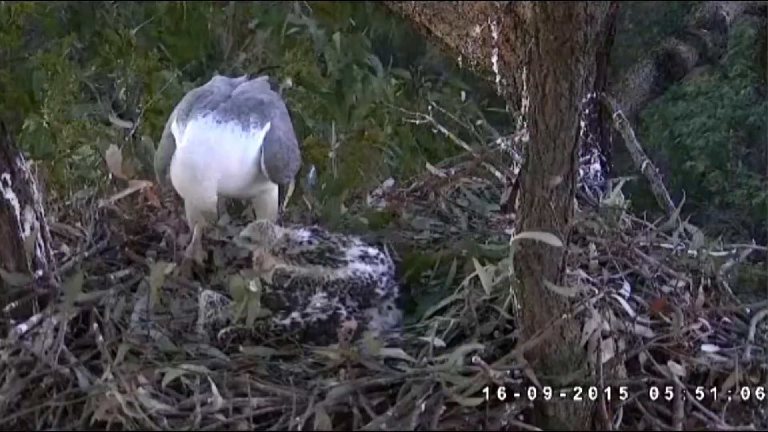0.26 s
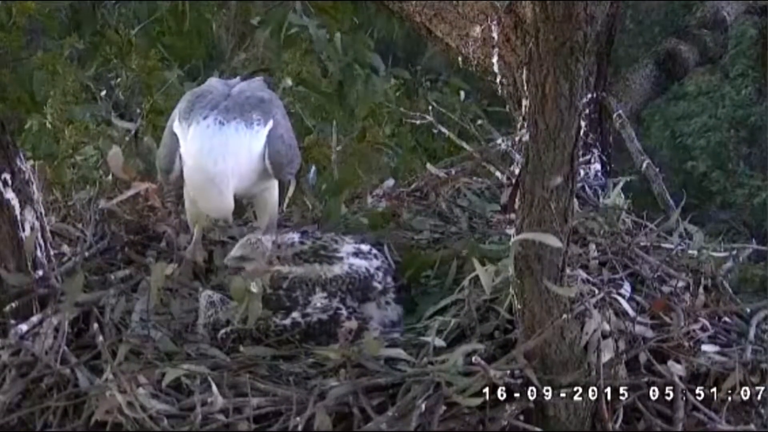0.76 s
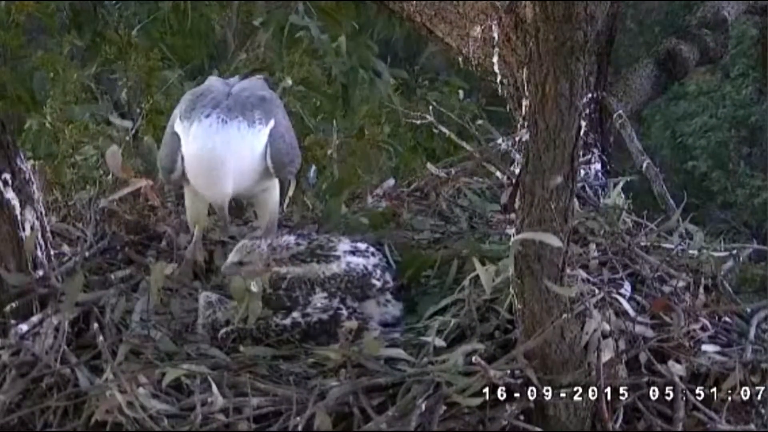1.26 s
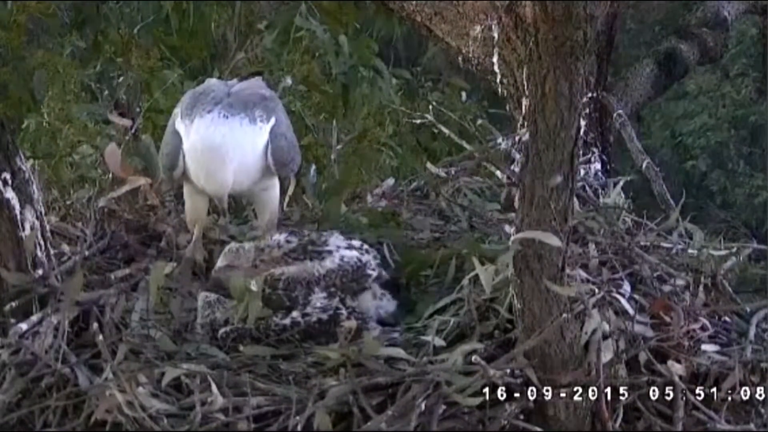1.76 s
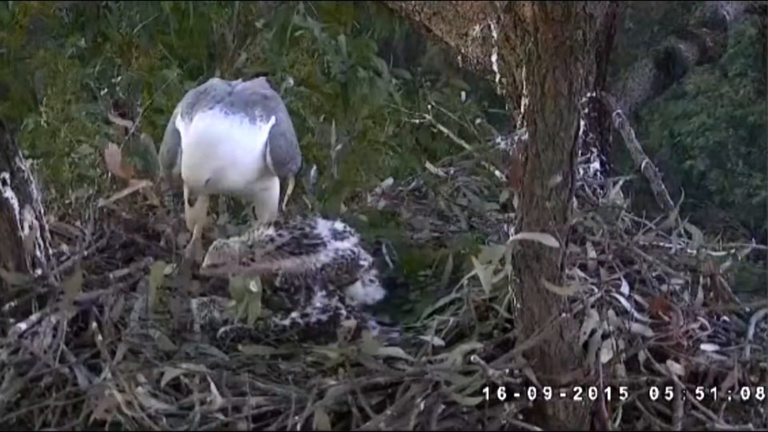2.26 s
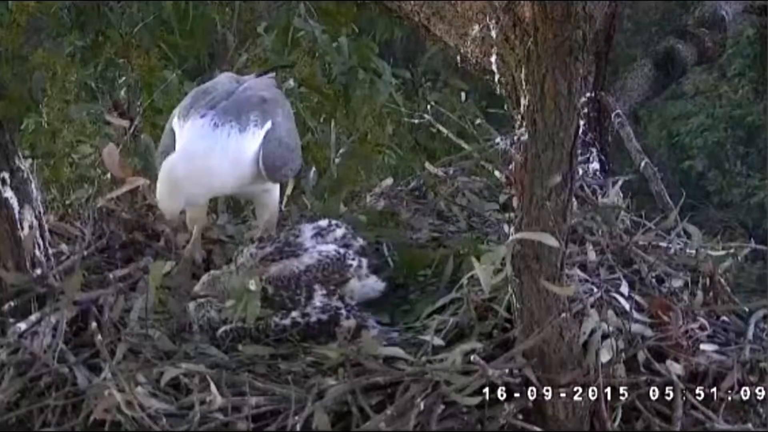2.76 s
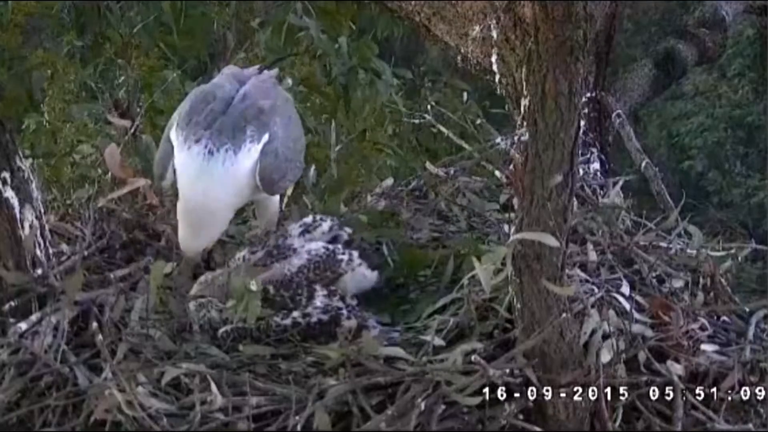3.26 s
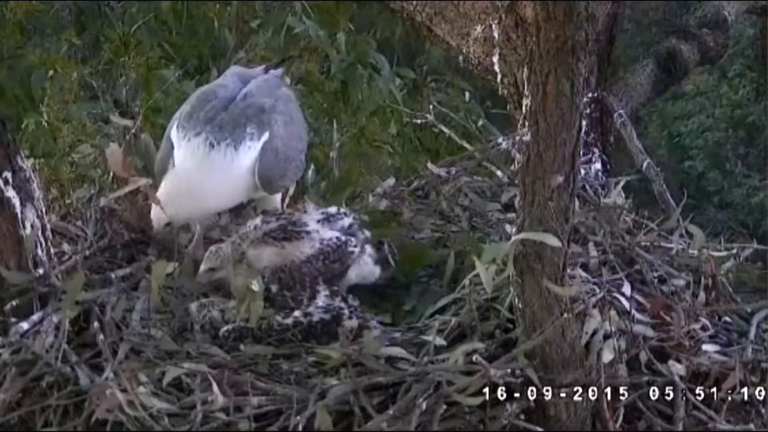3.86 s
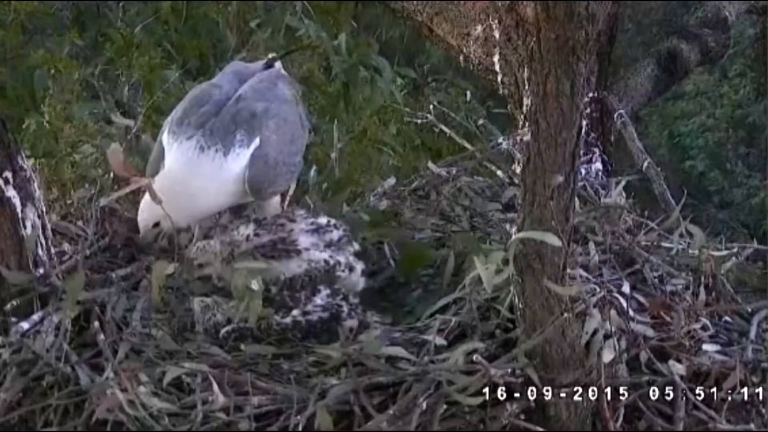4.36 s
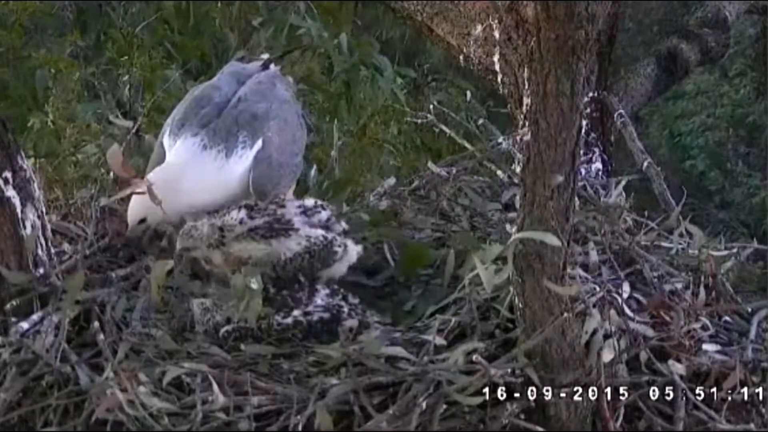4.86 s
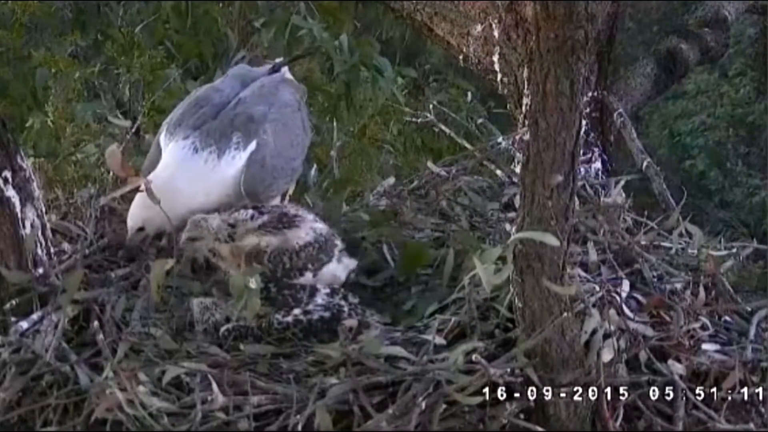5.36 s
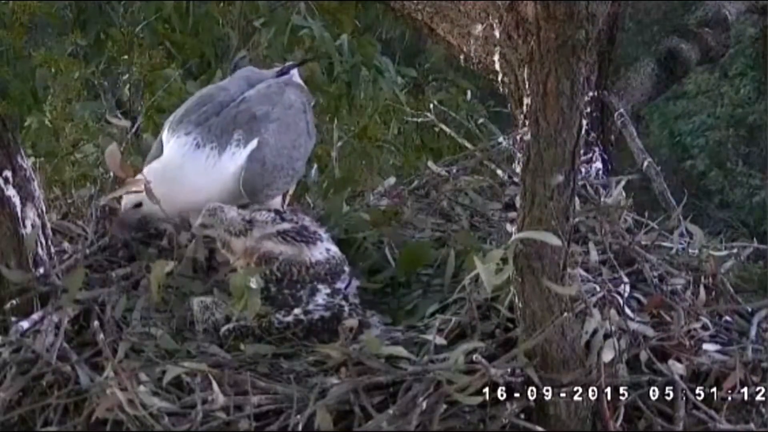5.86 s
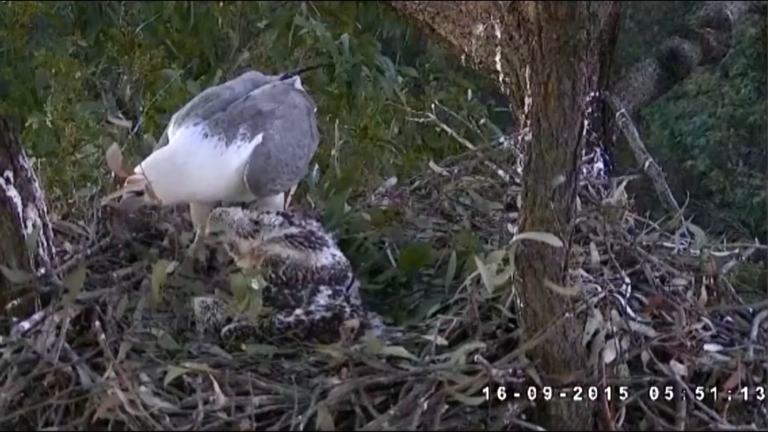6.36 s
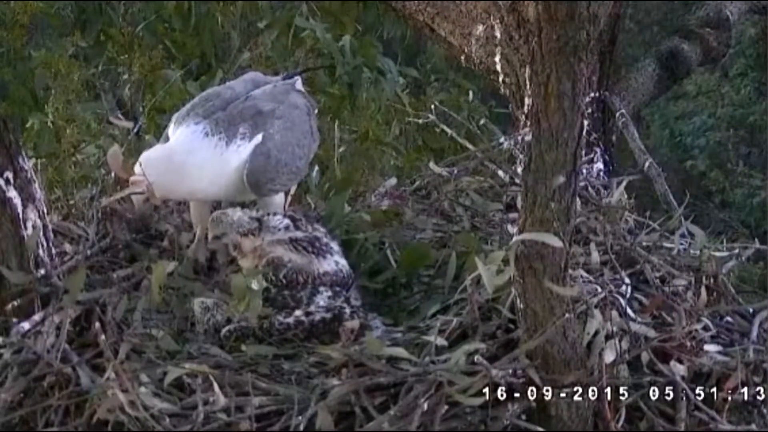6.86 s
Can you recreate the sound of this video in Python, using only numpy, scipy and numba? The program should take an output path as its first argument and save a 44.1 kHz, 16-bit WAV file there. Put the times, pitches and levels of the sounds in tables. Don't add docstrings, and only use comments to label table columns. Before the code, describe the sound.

A young raptor gives five harsh, raspy screeches from a forest nest, each ringing through the trees over low rumble and hum, with leaf rustles and twig snaps.

```python
import sys
import numpy as np
from scipy import signal
from scipy.fft import rfft, irfft, dct, next_fast_len
from scipy.io import wavfile
from scipy.ndimage import uniform_filter1d
from numba import njit

SR = 44100
rng = np.random.default_rng(int(sys.argv[2]) if len(sys.argv) > 2 else 0)


def wrap_up_sound(samples):
    columns = np.atleast_2d(samples).T
    tamed = np.clip(columns, -1, 1)
    steps = np.round(tamed * 32767).astype(np.int16)
    wavfile.write(sys.argv[1], SR, steps)


def ratio_of_db(decibels):
    return 10 ** (np.asarray(decibels, float) / 20)


N = 313110

# (start [s], length [s], full effort [dB], swell [s], start below full [dB])
CALLS = [
    (0.18, 0.44, -39, 0.13, 10),
    (1.395, 0.45, -40, 0.059, 6),
    (2.269, 0.4, -38, 0.27, 1.5),
    (3.066, .46, -37.5, 0.19, 3.5),
    (6.029, 0.44, -38, 0.24, 5),
]


def rms_one(x):
    return x / np.sqrt(np.mean(x ** 2) + 1e-20)


def drift(rate):
    knots = rng.standard_normal(int(N / SR * 400))
    slow = signal.lfilter([1], [1, -np.exp(-rate / 64)], knots)
    place = np.linspace(40, len(slow) - 1, N)
    return np.interp(place, np.arange(len(slow)), rms_one(slow))


def coloured(x, spectrum):
    size = next_fast_len(len(x))
    hz, db = np.transpose(spectrum)
    bin_hz = np.arange(size // 2 + 1) * SR / size
    gain = ratio_of_db(np.interp(np.log(bin_hz + 1), np.log(hz), db))
    return rms_one(irfft(rfft(x, size) * gain, size)[:len(x)])


def gate(start, length, rise, fall):
    t = np.arange(N) / SR - start
    return np.clip(np.minimum(t / rise, (length - t) / fall + 1), 0, 1)


def traffic():
    # (frequency [Hz], density [dB per Hz])
    traffic_spectrum = [(22, -25), (50, -11.5), (130, -7.5), (155, -3), (220, -6.5), (295, 0), (345, -1.5),
                        (400, -12), (480, -17.5), (570, -22.5), (780, -22.5), (930, -13.5), (1080, -20.5),
                        (1400, -32)] + [(2500, -59.0)]
    return ratio_of_db(-43.5 + 1.2 * drift(1.6)) * coloured(rng.standard_normal(N), traffic_spectrum)


def far_leaves():
    # (frequency [Hz], density [dB per Hz])
    leaf_spectrum = [(500, -50)] + [(900, -19.5), (1400, 10), (2000, -3.5), (3200, -2), (4200, -11),
                                    (7000, -9.5), (9000, -19.5), (11700, -34)]
    return ratio_of_db(-66) * coloured(rng.standard_normal(N), leaf_spectrum)


def hum():
    # (frequency [Hz], level [dB], wavering [dB])
    machine_tones = [
        (349.3, -52, 2.5),
        (381.9, -45, .6),
        (1145.8, -62, .6),
    ]
    out = np.zeros(N)
    for hz, db, waver_db in machine_tones:
        level = np.sqrt(2) * ratio_of_db(db + waver_db * drift(4.6))
        cycles = np.cumsum(hz + .6 * waver_db * drift(5)) / SR
        out += level * np.sin(2 * np.pi * cycles)
    return out


def forest(x):
    # (frequency [Hz], time to fall by 60 dB [s])
    decay_times = [(800, 1.2), (2000, 1.36), (3000, 1.24), (5000, 1.4), (9000, 1)]
    hz, t60 = np.transpose(decay_times)
    t = np.arange(round(1.5 * SR)) / SR
    edges = 500 * 2 ** np.arange(0, 4.6, .5)
    echo = np.zeros(len(t))
    for low, high in zip(edges, edges[1:]):
        sos = signal.butter(2, [low, high], "band", fs=SR, output="sos")
        band = signal.sosfilt(sos, rng.standard_normal(len(t)))
        echo += band * ratio_of_db(-60 * t / np.interp(np.sqrt(low * high), hz, t60))
    echo *= (1 - np.exp(-t / 0.01)) / np.sqrt(np.sum(echo ** 2))
    start, stop = round(CALLS[0][0] * SR), round(sum(CALLS[0][:2]) * SR)
    earlier = np.r_[rms_one(x[start:stop]) * ratio_of_db(-39.5), np.zeros(SR // 5)]
    wash = signal.fftconvolve(np.r_[earlier, x], echo)
    return ratio_of_db(-9.5) * wash[len(earlier):len(earlier) + N]


@njit
def resonate(x, hz, width_hz, sr):
    r = np.exp(-np.pi * width_hz / sr)
    turn = np.cos(2 * np.pi * hz / sr)
    y = np.zeros_like(x)
    for i in range(2, len(x)):
        drive = (1 - r[i] ** 2) / 2 * (x[i] - x[i - 2])
        y[i] = drive + 2 * r[i] * turn[i] * y[i - 1] - r[i] ** 2 * y[i - 2]
    return y


def throat(voice, hz, width_hz):
    once = resonate(voice, hz, width_hz, SR)
    tone = resonate(once, hz, 3 * width_hz, SR)
    return tone / np.sqrt(uniform_filter1d(tone ** 2, size=2500) + 1e-12)


def peaks(x, modes):
    out = np.zeros(len(x))
    for k, (hz, width_hz, db) in enumerate(modes):
        out += (-1) ** k * ratio_of_db(db) * signal.lfilter(*signal.iirpeak(hz, hz / width_hz, SR), x)
    return out


def syrinx(per_s, weak_db, jitter, noise):
    cycles = np.cumsum(per_s * (1 + .04 * drift(25) + jitter * drift(300))) / SR
    whole = cycles.astype(int)
    weaker_db = weak_db * np.clip(1 + 0.61 * drift(26), 0, 3) * (whole % 2)
    size = ratio_of_db(rng.normal(0, 1.5, N)[whole] - weaker_db)
    pulses = (np.diff(whole, prepend=0) > 0) * size
    puffs = rng.standard_normal(N) * np.exp(-1.2 * (cycles % 1)) * size
    share = np.clip(noise, 0, 1)
    voice = np.sqrt(1 - share) * rms_one(pulses) + np.sqrt(share) * rms_one(puffs)
    return voice / np.sqrt(uniform_filter1d(voice ** 2, size=800))


def side_pockets(x, way):
    # (frequency [Hz], width [Hz], climb through the call [Hz])
    pockets = [
        (3680, 350, 350),
        (4850, 400, 550),
    ]
    for hz, width_hz, rise_hz in pockets:
        centre_hz = hz + rise_hz * way + 90 * drift(8)
        x = x - .6 * resonate(x, centre_hz, np.full(N, float(width_hz)), SR)
    return x


def screech():
    # (pulses [per s], weak to strong [dB], jitter [share], noise [0-1])
    call_voices = [(465, 4, .08, .6), (500, 3, .12, .7), (470, 3, .09, .6), (455, 4, .09, .6),
                   (470, 3, .12, .7)]
    # (lower [Hz], upper [Hz], lower width [Hz], upper width [Hz], upper climb [Hz])
    call_throats = [(2147, 2700, 110, 330, -2), (2097, 2650, 140, 220, -62), (2084, 2610, 150, 220, 40),
                    (2077, 2580, 250, 125, 90), (2150, 2600, 260, 200, 41)]
    # (lower [dB], beak [dB], rasp [dB], chest [dB])
    call_colours = [(4, 0, -12, -6.5), (1, -2.5, -13, -11), (-0.5, 0, -11, -9.5), (-3.5, -6, -15.5, -11),
                    (-2, -6, -15, -11)]
    # (upper bulge at mid-call [dB], beak opening start to end [dB],
    # rasp change [dB], lower change [dB], closing gape [dB])
    call_moves = [(7, 4.5, -1.5, -6, 1.5), (9, 2, 2.5, -1, 0), (11, 5, -4, -0.5, -2),
                  (8.5, 0, 3.5, 3.5, 5.5), (2.5, 10.5, 0.5, -1, -0.5)]
    # (frequency [Hz], width [Hz], level [dB])
    chest_modes = [(960, 220, -9), (1300, 200, -17), (1570, 200, -12), (1830, 250, -15)]
    # (frequency [Hz], width [Hz], level [dB])
    rasp_modes = [(4110, 160, 4.5), (4630, 260, -8.5), (4490, 220, -6.5), (5200, 600, -2.5),
                  (6010, 940, -8.5), (7390, 860, -11.5), (8800, 1600, -23)]

    t = np.arange(N) / SR
    call = np.clip(np.searchsorted([row[0] for row in CALLS], t) - 1, 0, None)
    start, length, full_db, swell, below_db = np.array(CALLS, float)[call].T
    lower_hz, upper_hz, lower_width_hz, upper_width_hz, climb_hz = np.array(call_throats, float)[call].T.copy()
    lower_db, beak_db, rasp_db, chest_db = np.array(call_colours, float)[call].T
    bulge_db, opening_db, rasp_change_db, lower_change_db, gape_db = np.array(call_moves, float)[call].T

    way = np.clip((t - start) / length, 0, 1) - .5
    effort_db = full_db - below_db * np.clip(1 - (t - start) / swell, 0, 1) + .6 * drift(40)
    onset_s, release_s, linger_s = .025, .026, .05
    breath = sum(gate(s, held, onset_s, release_s) for s, held, *_ in CALLS)
    last_breath = sum(gate(s, held, onset_s, release_s + linger_s) for s, held, *_ in CALLS)
    gape_db = gape_db * np.clip((t - start - length) / .08 + 1.8, 0, 1)
    voice = np.tanh(syrinx(*np.array(call_voices, float)[call].T) / 4.0)

    wobble_hz, wobble_db = 25, 1.2
    upper_now_hz = upper_hz + climb_hz * way + wobble_hz * drift(23)
    upper = throat(voice, upper_now_hz, upper_width_hz * ratio_of_db(gape_db))
    upper *= ratio_of_db(bulge_db * (.5 - 4 * way ** 2) - .5 * gape_db)
    lower = throat(voice, lower_hz + .5 * wobble_hz * drift(29), lower_width_hz)
    lower *= ratio_of_db(lower_db + lower_change_db * way + wobble_db * drift(45))
    beak = throat(voice, 3136 + 195 * way, np.full(N, 750.0))
    beak *= ratio_of_db(beak_db + opening_db * way + gape_db + wobble_db * drift(40))

    low = signal.butter(3, [750, 2000], "band", fs=SR, output="sos")
    high = signal.butter(4, 3850, "high", fs=SR, output="sos")
    neck_band = signal.butter(4, [1870, 3501], "band", fs=SR, output="sos")
    chest = ratio_of_db(chest_db) * rms_one(signal.sosfilt(low, peaks(voice, chest_modes)))
    rasp = rms_one(signal.sosfilt(high, peaks(voice, rasp_modes)))
    rasp *= ratio_of_db(rasp_db + rasp_change_db * way + wobble_db * drift(52))

    squeeze = 3.4
    joined = breath * (upper - beak) - last_breath * lower
    neck = signal.sosfilt(neck_band, squeeze * np.tanh(joined / squeeze))
    out = side_pockets(neck + breath * (chest + rasp), way)
    return ratio_of_db(effort_db - 3.0) * out


def rustle():
    # (start [s], length [s], level [dB])
    brush_strokes = [(0.987, 0.094, -70), (1.151, 0.17, -73.5), (1.302, 0.033, -68), (2.11, .065, -85),
                     (2.737, .17, -72.5), (3.53, 0.057, -67), (3.601, 0.062, -61), (3.663, 0.063, -68.5),
                     (3.803, 0.13, -83), (4.095, 0.2, -72), (4.301, 0.055, -67), (4.364, .09, -73),
                     (4.537, 0.12, -77), (4.675, 0.097, -72), (4.837, 0.052, -72), (4.916, 0.11, -74.5),
                     (5.035, 0.12, -73), (5.185, 0.13, -72.5), (5.33, .38, -80), (5.756, 0.19, -77),
                     (6.488, .16, -69), (6.652, 0.11, -76), (6.75, 0.094, -75), (6.878, 0.12, -73)]
    # (frequency [Hz], density [dB per Hz])
    scratch_spectrum = [(1470, -16), (2500, 6.5), (3440, -12.5), (3740, 4.5), (4560, 0), (7030, 4),
                        (8300, 1.5), (9260, -8), (11500, -19), (15000, -51), (22000, -120)]
    struck = rng.random(N) < 5000 / SR
    size = ratio_of_db(2.7 * np.minimum(rng.exponential(1, N), 4))
    grains = struck * size * rng.choice([-1, 1], N)
    edge_s = .012
    level = ratio_of_db(-86.5) + sum(ratio_of_db(db) * gate(s, length, edge_s, edge_s) for s, length, db in brush_strokes)
    return ratio_of_db(2.0 + 1.2 * drift(40)) * level * coloured(grains, scratch_spectrum)


def twigs():
    # (time [s], peak level [dB])
    twig_snaps = [
        (3.6377, -44),
        (4.097, -62),
        (4.317, -45),
        (4.512, -48.5),
    ]
    out = np.zeros(N)
    t = np.arange(900) / SR
    for s, db in twig_snaps:
        out[round(s * SR):][:900] = ratio_of_db(db + 2.5 - 60 * t / 0.01) * rng.standard_normal(900)
    return signal.sosfilt(signal.butter(2, [4500, 9500], "band", fs=SR, output="sos"), out)


def far_birds():
    # (start [s], length [s], start pitch [Hz], end pitch [Hz], level [dB])
    whistles = [(4.635, 0.041, 3100, 3360, -63), (4.817, 0.055, 3316, 3550, -64),
                (4.905, 0.046, 3110, 3320, -71), (5.0, 0.084, 3570, 3140, -68.5),
                (5.046, 0.075, 2980, 2254, -69), (5.786, 0.068, 3668, 3218, -65.5),
                (5.828, 0.04, 3200, 4000, -63.5), (5.857, 0.072, 3900, 4040, -65),
                (6.74, 0.066, 3950, 5880, -69.5), (6.866, 0.038, 1792, 2355, -52),
                (6.992, 0.066, 1970, 2390, -57.5)]
    out = np.zeros(N)
    for s, length, start_hz, end_hz, db in whistles:
        u = np.linspace(0, 1, round(length * SR))
        glide_hz = start_hz + (end_hz - start_hz) * u
        tone = np.sin(2 * np.pi * np.cumsum(glide_hz) / SR)
        out[round(s * SR):][:len(u)] += ratio_of_db(db + 2.5) * np.sin(np.pi * u) * tone
    return out * (.8 + .3 * drift(120) + .8 * drift(500))


def scene():
    calls = screech() + far_birds()
    background = traffic() + far_leaves() + hum()
    heard = calls + forest(calls) + rustle() + twigs() + background
    return np.array([0 * heard, heard])


def input_hiss():
    # (frequency [Hz], density [dB per Hz])
    hiss_spectrum = [(25, 24.5), (150, -19), (600, -4.5), (8000, 4.5), (11500, 4)]
    return ratio_of_db(-77) * coloured(rng.standard_normal(N), hiss_spectrum)


def fold(blocks, rise, fall, sign):
    before, after = blocks[:-1, 1, ::-1], blocks[1:, 0]
    new_before = rise * before - sign * fall * after
    new_after = rise * after + sign * fall * before
    blocks[:-1, 1, ::-1], blocks[1:, 0] = new_before, new_after


def round_bands(x, size=1024, count=42):
    # (from [s], to [s], rise of the step [dB])
    coarse_spells = [
        (1.15, 2.27, 4.5),
        (4.35, 5.62, 4.5),
    ]
    # (frequency [Hz], level [dB])
    step_tilt = [(300, -16), (700, -10), (1500, -3), (2500, -4.5), (3300, -3), (4500, 1.5), (7000, -.5),
                 (9300, 2.5), (11000, -4)]
    top_hz, offset = 11750, 756
    half, frames = size // 2, len(x) // size + 3
    lead = half + size - offset
    window = np.sin(np.pi * (np.arange(size) + .5) / (2 * size))
    rise, fall = window[half:], window[:half][::-1]
    blocks = np.pad(x, (lead, frames * size - len(x) - lead)).reshape(frames, 2, half)
    fold(blocks, rise, fall, 1)
    lines = dct(blocks.reshape(frames, size), type=4, norm="ortho")

    hz = (np.arange(size) + .5) * SR / 2 / size
    band = (count * np.log1p(hz / 900) / np.log1p(top_hz / 900)).astype(int)
    bands = np.arange(band[-1] + 1)
    power = np.array([np.mean(lines[:, band == b] ** 2, axis=1) for b in bands]).T
    level_db = 10 * np.log10(power + 1e-20)
    apart = abs(np.subtract.outer(bands, bands))
    mask_db = np.max(level_db[:, :, None] - 5 * apart, axis=1)
    now = (np.arange(frames)[:, None] - 1) * size / SR
    mask_db += 6 + sum(db * (now > first) * (now < last) for first, last, db in coarse_spells)
    mask_db += 3.5 * rms_one(uniform_filter1d(rng.standard_normal(mask_db.shape), size=3, axis=0))
    step = ratio_of_db(mask_db[:, band] + np.interp(hz, *np.transpose(step_tilt)))
    lines = np.round(lines / step) * step * (hz < top_hz)

    blocks = dct(lines, type=4, norm="ortho").reshape(frames, 2, half)
    fold(blocks, rise, fall, -1)
    return blocks.ravel()[lead:lead + len(x)]


def band_limit(x):
    return signal.sosfilt(signal.butter(12, 11910, fs=SR, output="sos"), x)


def record(dry):
    right = ratio_of_db(6.5) * dry[1]
    leak = ratio_of_db(-47) * np.diff(right, prepend=0)
    left = leak + input_hiss()
    return band_limit(np.array([round_bands(left), round_bands(right)]))


dry = scene()
out = record(dry)
wrap_up_sound(out)
```